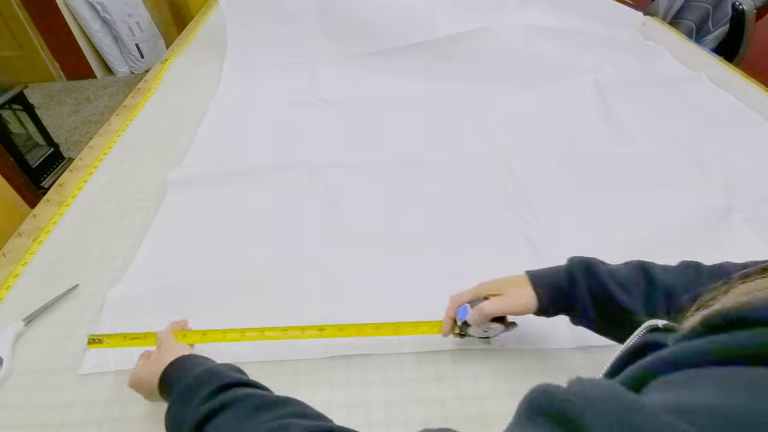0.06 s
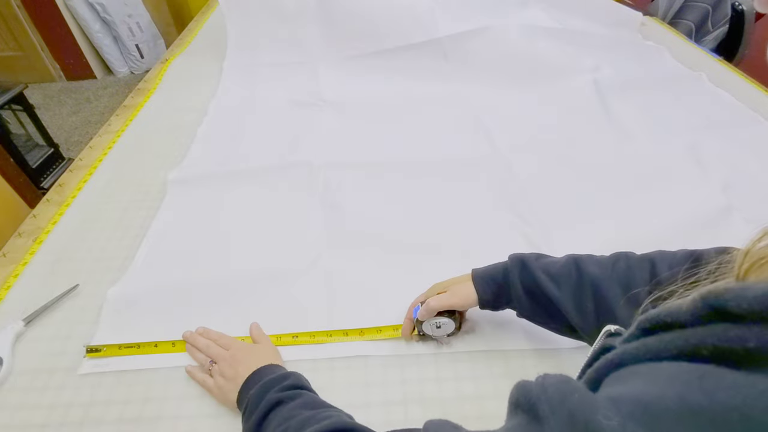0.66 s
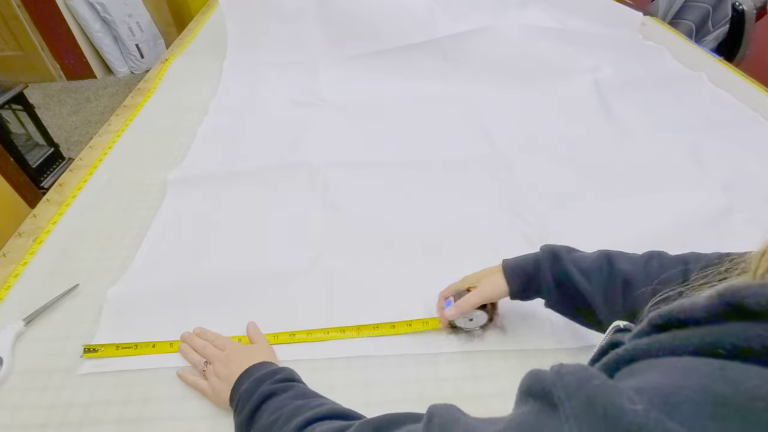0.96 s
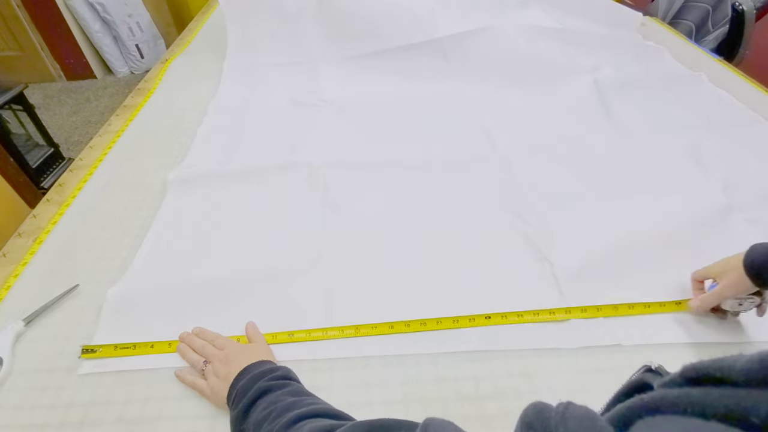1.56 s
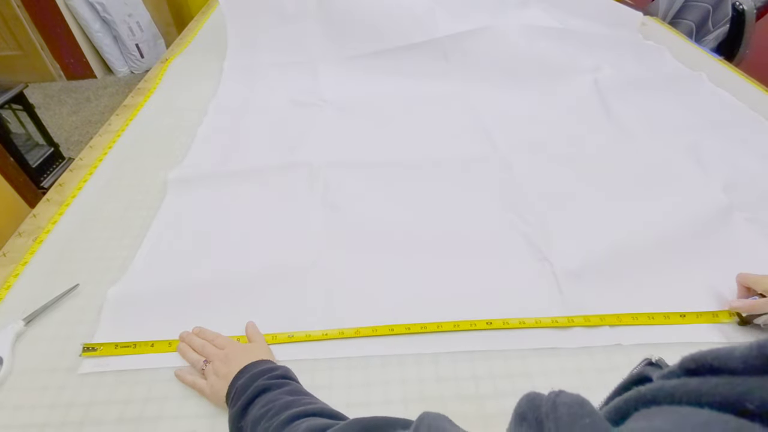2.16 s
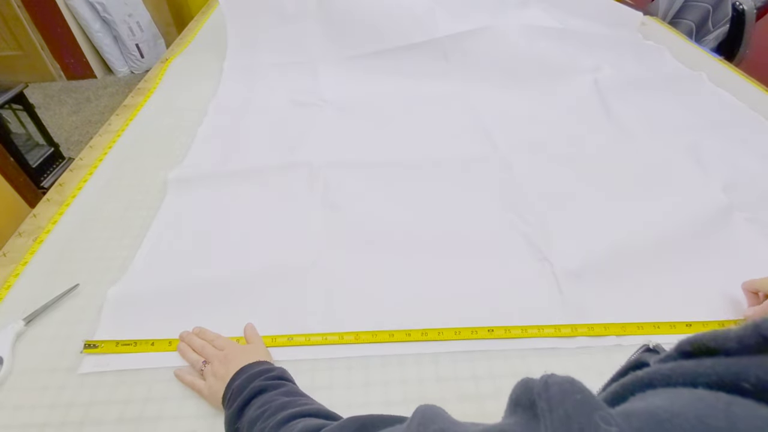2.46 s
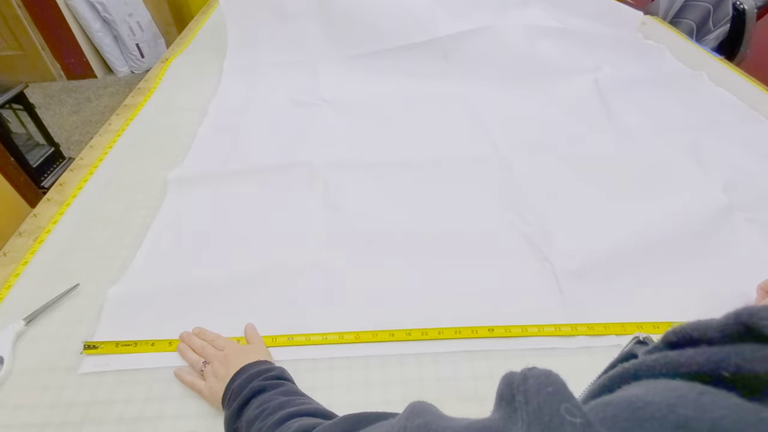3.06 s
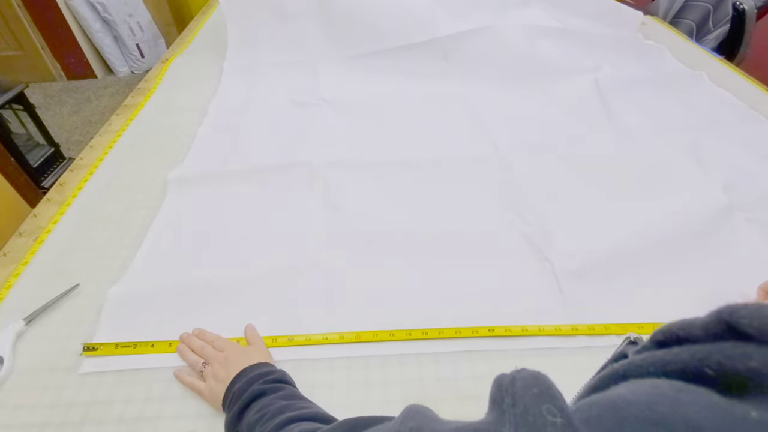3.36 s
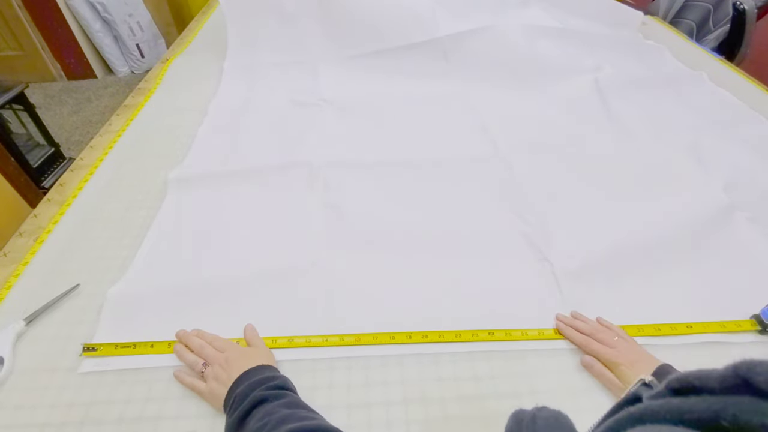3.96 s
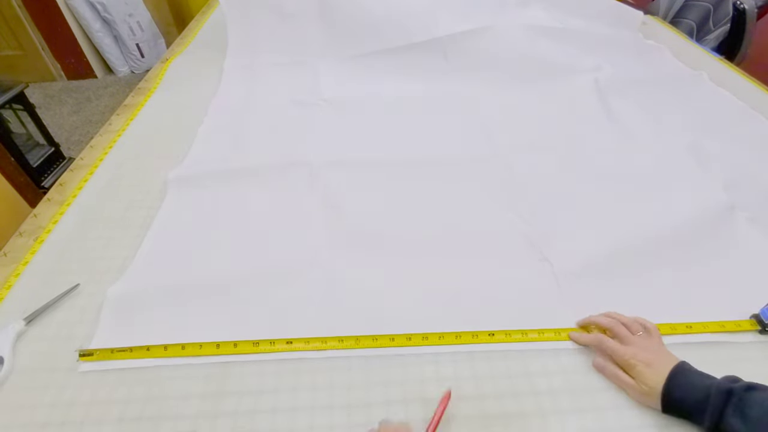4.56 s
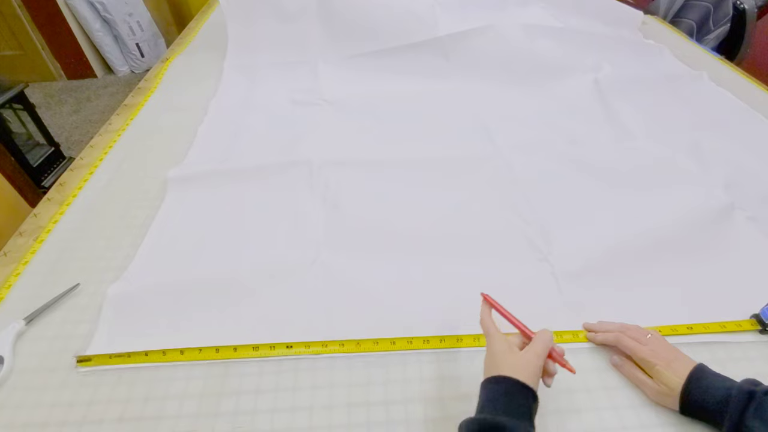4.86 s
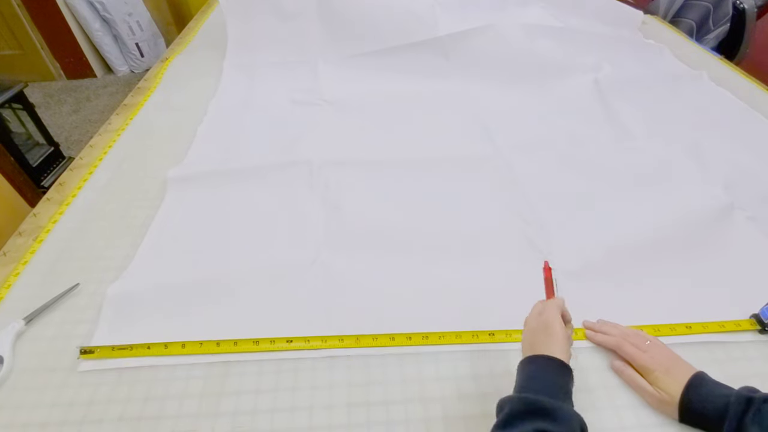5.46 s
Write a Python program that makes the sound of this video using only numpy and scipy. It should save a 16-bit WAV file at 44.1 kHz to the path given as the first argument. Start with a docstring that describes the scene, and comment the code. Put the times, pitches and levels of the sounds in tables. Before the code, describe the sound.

Indoors, a tape measure blade snaps onto a table and slides out with clicks, then low thumps and crisp fabric rustling.

```python
"""A steel tape measure on stiff fabric, on a craft table in a small room. The blade slaps down and rings,
then hisses out by sliding friction, in one long pull and a few tugs, as its coil scrapes in the case.
The case is set down with two dull bumps that excite the modes of the table top. A hand smooths the
fabric, which crackles as it buckles, and picks up a pen. Ventilation and mains hum fill the room."""
import sys
import numpy as np
from scipy import signal
from scipy.fft import rfft, irfft, next_fast_len
from scipy.io import wavfile
from scipy.ndimage import uniform_filter1d, map_coordinates

SR = 44100
rng = np.random.default_rng(int(sys.argv[2]) if len(sys.argv) > 2 else 0)


def dump_mix(stems):
    """Bounce the given channels to the path in sys.argv[1] as a 16-bit WAV at rate SR."""
    frames = np.atleast_2d(stems).T  # one column per channel
    limited = np.clip(frames, -1, 1)  # hard clip at full scale
    pcm = np.round(limited * 32767).astype(np.int16)
    wavfile.write(sys.argv[1], SR, pcm)


N = 246938

# Coherence of a diffuse field. Each row: frequency in Hz, left-right correlation.
DIFFUSE_COHERENCE = [(60, 0.32), (130, 0.78), (380, 0.78), (750, -0.083), (1300, -0.22), (5500, 0.059),
                     (8000, 0.86), (15000, 0.96)]
# Spectrum of buckling fabric. Each row: frequency in Hz, relative density in dB.
CREASE_SPECTRUM = [(300, -40), (900, -16.5), (1900, -30), (2800, -21), (4100, -11), (5700, -13),
                   (7800, -1.5), (10000, -6), (11500, 0), (13500, -3), (16000, -1)]


def amp(db):
    """Decibels as an amplitude ratio."""
    return 10 ** (np.asarray(db) / 20)


def unit(x):
    """Normalisation to rms 1."""
    return x / np.sqrt(np.mean(x ** 2) + 1e-20)


def decay(t, t60):
    """Exponential damping: 60 dB in t60 seconds."""
    return amp(-60 * t / t60)


def along(points, hz):
    """Interpolation of (Hz, value) points on a logarithmic frequency axis."""
    f, values = np.transpose(points)
    return np.interp(np.log(hz + 1), np.log(f + 1), values)


def wobble(rate):
    """Smooth random modulation, with rate knots a second."""
    knots = rng.standard_normal(int(N * rate / SR) + 4)
    return map_coordinates(knots, [np.arange(N) * rate / SR])


def filtered(x, response):
    """Linear filtering: the spectrum is multiplied by a frequency response."""
    n = x.shape[-1]
    m = next_fast_len(n + 8192)
    return irfft(rfft(x, m) * response(np.fft.rfftfreq(m, 1 / SR)), m)[..., :n]


def coloured(pair, spectrum, coherence=None):
    """Partial coherence: two independent signals mix into left and right with a given spectrum."""
    # Coherence of a nearby source. Each row: frequency in Hz, left-right correlation.
    near_coherence = [(250, 0.99), (800, 0.75), (2200, 0.51), (4500, 0.2), (6400, 0.15), (7800, 0.65),
                      (16000, 0.57)]

    def response(hz):
        angle = np.arccos(np.clip(along(coherence or near_coherence, hz), -1, 1)) / 2
        return amp(along(spectrum, hz)) * [np.cos(angle), np.sin(angle)]
    mid, side = filtered(pair, response)
    return np.array([mid + side, mid - side])


def panned(x, pan_db):
    """Level difference: left exceeds right by pan_db."""
    return x * amp(np.array([pan_db, -pan_db]) / 2).reshape(2, -1)


def shaded(x, pan_db):
    """Acoustic shadow: an obstacle screens the far microphone, most at short wavelengths."""
    treble = filtered(x, lambda hz: 1 / (1 + (9000 / (hz + 1)) ** 3))
    return x - treble + panned(treble, pan_db)


def placed(x, lead_s, below_hz=6800):
    """Time difference: under below_hz, the left channel leads by lead_s."""
    phase = lambda hz: np.pi * hz * lead_s * (hz < below_hz)
    return filtered(x, lambda hz: np.exp(1j * np.array([phase(hz), -phase(hz)])))


def add(track, s, x):
    """Superposition of x on the track from s seconds."""
    start = max(round(s * SR), 0)
    track[:, start:start + x.shape[-1]] += x[..., :N - start]


def grains(rate, spread_db, size=N):
    """Friction as a Poisson process: tiny slips of uneven size, on average rate a second."""
    slips = rng.random(size) < rate / SR
    strength = amp(spread_db * np.minimum(rng.exponential(size=size), 4))
    return slips * strength * rng.standard_normal((2, size))


def stroke(length):
    """Stick-slip friction under a push that swells quickly and fades after length seconds."""
    progress = np.arange(SR // 4) / SR / length
    slips = unit(grains(rate=2100, spread_db=0.0, size=len(progress)))
    return slips * (1 - np.exp(-progress / 0.034)) / (1 + progress ** 8)


def gesture(s, length, attack_s=0.012, release_s=0.028):
    """Envelope of one hand movement: exponential attack, hold, exponential release."""
    t = np.maximum(np.arange(N) / SR - s, 0)
    return (1 - np.exp(-t / attack_s)) * np.exp(-np.maximum(t - length, 0) / release_s)


def shifting(x, patchy_db, peak_db=0, glide=None):
    """Resonances come and go as a contact moves; a broad one may glide along (s, Hz) points."""
    hz, t, spectra = signal.stft(x, SR, nperseg=512)
    patches = uniform_filter1d(rng.standard_normal(spectra.shape[1:]), size=5, axis=0)
    patches = uniform_filter1d(patches, size=9, axis=1)
    gain = amp(patchy_db * unit(patches))
    if glide:
        octaves = np.log2((hz[:, None] + 1) / np.interp(t, *np.transpose(glide)))
        gain *= amp(peak_db * np.exp(-(octaves / 0.22) ** 2))
    gain /= np.sqrt(np.mean(gain ** 2, axis=0))
    return signal.istft(spectra * gain, SR, nperseg=512)[1][:, :N]


def ring(modes, t):
    """Free vibration: a sum of damped modes, struck at new strengths each time."""
    return sum(amp(db + rng.normal(0, 1)) * decay(t, t60) * np.sin(2 * np.pi * hz * t)
               for hz, db, t60 in modes)


def burst(spectrum, vary_db, rise_s, t60, tail_db, tail_t60):
    """A broadband transient with a slower tail, coloured anew each time; rms 1 over its loudest 2 ms."""
    t = np.arange(SR // 3) / SR
    envelope = (1 - np.exp(-t / rise_s)) * (decay(t, t60) + amp(tail_db) * decay(t, tail_t60))
    ripple_db = vary_db * rng.standard_normal(44)
    ripple = lambda hz: amp(np.interp(hz, np.linspace(0, SR / 2, len(ripple_db)), ripple_db))
    noise = filtered(rng.standard_normal((2, len(t))), ripple)
    crack = coloured(noise, spectrum) * envelope
    power = uniform_filter1d(np.mean(crack ** 2, axis=0), size=88)
    return crack / np.sqrt(power.max())


def ventilation():
    """Moving air makes a low, diffuse rush; fan and mains add wavering tones."""
    # Air noise. Each row: frequency in Hz, relative density in dB.
    air_spectrum = [(25, -17), (60, -8), (84, -4), (103, 3), (138, -10.5), (200, -8.5), (390, -9.5),
                    (620, -22), (880, -16), (1600, -35.5), (2500, -26), (3100, -36.5), (16000, -37.5)]
    # Fan and mains tones. Each row: frequency in Hz, nominal rms level in dB.
    tones = [(120, -68), (171, -73), (207, -72.5), (268, -77.5)]
    t = np.arange(N) / SR
    air = amp(-62) * unit(coloured(rng.standard_normal((2, N)), air_spectrum, DIFFUSE_COHERENCE))
    hum = np.zeros(N)
    for hz, db in tones:
        peak = np.sqrt(2) * amp(db + 1.5 * wobble(4.6))
        hum += peak * np.sin(2 * np.pi * hz * t + 0.35 * wobble(4.01))
    return panned(air + hum, pan_db=1.5)


def room(x):
    """Reverberation: reflections arrive from all sides, and the treble is absorbed first."""
    # Reverberation time. Each row: frequency in Hz, T60 in seconds.
    decay_times = [(150, 0.55), (1000, 0.31), (5000, 0.24), (10000, 0.11), (16000, 0.057)]
    # Colour of the reflections. Each row: frequency in Hz, gain in dB.
    wall_response = [(100, 2.5), (1000, -2), (4000, 0), (14000, 0.5)]
    hz, t, spectra = signal.stft(rng.standard_normal((2, SR // 2)), SR, nperseg=256)
    tail = signal.istft(spectra * decay(t, along(decay_times, hz)[:, None]), SR, nperseg=256)[1]
    tail = np.pad(tail / np.linalg.norm(tail[0]), ((0, 0), (SR // 200, 0)))  # 5 ms of travel
    return coloured(signal.fftconvolve(x, tail, axes=1)[:, :N], wall_response, DIFFUSE_COHERENCE)


def hand_pan(s):
    """The level difference that locates the hand at s seconds."""
    # The hand's path. Each row: time in seconds, left-over-right treble level in dB.
    path = [(0, 10), (0.2, 0), (0.7, -3), (2, 0), (3.8, -1), (4.05, -1.5), (4.8, -9), (5.6, -9.5)]
    return np.interp(s, *np.transpose(path))


def rustle(snaps_per_s=60, snap_decay_s=0.003):
    """Friction of skin and sleeves on the weave comes in clumps and sets off small snaps."""
    # Rubs. Each row: start in seconds, length in seconds, relative level in dB.
    rubs = [(0.0, 0.35, -55.5), (0.413, 0.34, -69), (0.587, 0.018, -56), (2.878, 0.24, -82.5),
            (3.216, 0.038, -74), (3.435, 0.035, -74.5), (3.554, 0.032, -67.5), (3.82, 0.51, -74.5),
            (3.845, 0.018, -62), (4.053, 0.03, -58.5), (4.376, 0.3, -68), (4.474, 0.12, -61.5),
            (4.675, 0.13, -60), (4.787, 0.059, -44.5), (5.0, 0.55, -77), (5.26, 0.04, -65),
            (5.396, 0.03, -65)]
    # Friction on cloth. Each row: frequency in Hz, relative density in dB.
    rub_spectrum = [(700, -20), (1800, -15), (2800, -15.5), (4100, -13.5), (5700, -11), (8200, -7.5),
                    (11500, -8), (15000, -6), (16000, -13)]
    push = sum(amp(db) * gesture(s, length) for s, length, db in rubs)
    clumps = grains(rate=7400, spread_db=2.0) * amp(4 * wobble(130))
    weave = shifting(coloured(clumps, rub_spectrum), patchy_db=3.5)
    snap = np.exp(-np.arange(SR // 20) / SR / snap_decay_s)
    flurry = signal.fftconvolve(rng.random(N) < snaps_per_s / SR, snap)[:N]
    crackle = coloured(flurry * rng.standard_normal((2, N)), CREASE_SPECTRUM)
    cloth = amp(3.5) * unit(weave) + amp(-4) * unit(crackle)
    return shaded(push * cloth, hand_pan(np.arange(N) / SR))


def creases():
    """Buckling: stiff fabric and the blade on it snap brightly under the fingers."""
    # Snaps. Each row: start in seconds, relative level in dB.
    snaps = [(0.0166, -38.5), (0.042, -42), (0.104, -32.5), (0.1614, -28.5), (0.1664, -32), (0.2097, -24.5),
             (1.876, -35), (2.048, -44), (2.691, -42), (4.0539, -30), (4.0766, -27.5), (4.34, -45),
             (4.3573, -36), (4.691, -37), (4.7399, -33.5), (4.7702, -29.5), (4.794, -17.5), (4.8388, -15),
             (4.883, -26), (4.9172, -32.5), (4.9406, -34), (5.002, -38), (5.0465, -39), (5.1295, -37.5),
             (5.164, -44), (5.1824, -41), (5.246, -39.5), (5.275, -37.5), (5.3675, -48), (5.401, -37.5),
             (5.478, -46), (5.5085, -46)]
    out = np.zeros((2, N))
    for s, db in snaps:
        snap = burst(CREASE_SPECTRUM, vary_db=4.5, rise_s=0.0012, t60=0.02, tail_db=-32.5, tail_t60=0.11)
        add(out, s, amp(db - 6) * shaded(snap, hand_pan(s)))
    return out


def scuffs():
    """Friction of fingers and pen on the table drives a broad, dull resonance."""
    # Scuffs. Each row: start in seconds, length in seconds, level in dB, centre frequency in Hz.
    contacts = [(3.547, 0.091, -58, 484), (4.011, 0.11, -63.5, 1040), (4.358, 0.015, -53.5, 604),
                (4.367, 0.045, -54, 980), (4.428, 0.13, -63, 940), (4.491, 0.048, -55.5, 1063),
                (4.519, 0.031, -52, 1650), (4.567, 0.0224, -58.5, 1330), (4.8, 0.12, -66, 730)]
    out = np.zeros((2, N))
    for s, length, db, hz in contacts:
        resonance = [(hz / 5, -22), (hz / 2.57, -6), (hz, 0),
                     (hz * 1.54, -6), (hz * 2.9, -18), (hz * 9, -38)]
        scuff = coloured(stroke(length), resonance)
        rms = np.sqrt(np.sum(scuff[0] ** 2) / (length * SR))
        add(out, s, amp(db) * scuff / rms)
    return out


def bumps(right_lag_s=0.0035, landing_s=3.557):
    """Impacts of blade and case excite the table's low modes; the case lands with a knock."""
    # Impacts on the table. Each row: start in seconds, relative level in dB.
    impacts = [(0.243, -58), (2.073, -61.5), (3.229, -39), (3.558, -44.5), (3.603, -42.5)]
    # Modes of the table, and of the case on it. Each row: frequency in Hz, gain in dB, T60 in seconds.
    table_modes = [(45.1, -14, 0.6), (61.65, 2, 0.46), (81, -1.5, 0.9), (101, -8.5, 0.35),
                   (170.2, -8.5, 0.27), (273, -15, 0.2)]
    knock_modes = [(233, -11.5, 0.47), (272, -7.5, 0.29), (591, -4, 0.21), (695, -15, 0.25),
                   (1277, -18, 0.14)]
    out, t = np.zeros((2, N)), np.arange(SR) / SR
    late = np.maximum(t - right_lag_s, 0)
    for s, db in impacts:
        boom = np.array([ring(table_modes, t), ring(table_modes, late)])
        add(out, s, amp(db) * boom * (1 - np.exp(-t / 0.0052)))
    out = panned(out, pan_db=7.0)
    knock = ring(knock_modes, t) * (1 - np.exp(-t / 0.0064))
    add(out, landing_s, amp(-40) * knock)
    return out


def drags():
    """Forced vibration: the hollow case groans as it judders over the table."""
    # Slides of the case. Each row: start in seconds, length in seconds, relative level in dB.
    slides = [(0.529, 0.1, -56), (1.074, 0.034, -54.5), (1.159, 0.057, -43), (1.51, 0.083, -58.5),
              (2.544, 0.068, -67), (3.555, 0.043, -56.5)]
    # Resonances of the case. Each row: frequency in Hz, bandwidth in Hz, gain in dB.
    shell_modes = [(639, 31, -3.5), (775.5, 51, 0.5), (964, 75, -18.5)]

    def shell(f):
        return sum(amp(db) * 1j * f * width / (hz ** 2 - f ** 2 + 1j * f * width)
                   for hz, width, db in shell_modes)
    out = np.zeros((2, N))
    for s, length, db in slides:
        add(out, s, amp(db + 22) * filtered(stroke(length), shell))
    return out


def ticks():
    """Brief contacts have wide spectra: the blade catches on the mouth of its case."""
    # Catches. Each row: start in seconds, relative level in dB.
    catches = [(0.4327, -32.5), (0.4474, -28), (0.6013, -32), (0.6744, -42.5), (0.7108, -48),
               (1.0645, -27.5), (1.0872, -28.5), (1.3131, -34.5), (1.3254, -18.5), (1.3358, -26),
               (1.446, -24), (1.491, -26), (1.7003, -25), (2.0204, -36), (2.2866, -33)]
    # One tick. Each row: frequency in Hz, relative density in dB.
    spectrum = [(200, -14), (700, 9.5), (1500, -5.5), (2200, 4.5), (3600, 7.5), (5500, 3), (8000, 6.5),
                (15500, 7)]
    out = np.zeros((2, N))
    for s, db in catches:
        tick = burst(spectrum, vary_db=5.0, rise_s=0.0006, t60=0.017, tail_db=-42.0, tail_t60=0.042)
        add(out, s, amp(db - 12) * tick)
    return out


def pull(start_hz=7757, end_hz=14400, taut_s=1.01):
    """Sliding friction: the blade hisses through the slot as the coil scrapes in the plastic case."""
    # The long pull. Each row: time in seconds, hiss level in dB, which follows the speed.
    long_pull = [(0.87, -66.5), (0.96, -51), (1.05, -56.5), (1.09, -48.5), (1.3, -48), (1.48, -45.5),
                 (1.66, -58), (1.76, -52.5), (1.87, -69.5)]
    # Tugs. Each row: start and length in seconds, relative hiss and rattle in dB, resonance in Hz.
    tugs = [(1.864, 0.078, -58, -70.5, 8500), (1.989, 0.079, -70, -71.5, 9000),
            (2.267, 0.035, -59.5, -77, 7800), (2.425, 0.08, -61, -78, 3930), (2.509, 0.071, -59, -68, 3700),
            (2.67, 0.016, -69, -77, 8000)]
    # Friction of blade and of coil. Each row: frequency in Hz, relative density in dB.
    blade_spectrum = [(2000, -13.5), (3500, -4), (5500, -2), (8000, 0.5), (11800, 2.5), (13200, 1),
                      (15200, 4.5), (16000, -3)]
    coil_spectrum = [(120, -4), (380, 3.5), (680, -1.5), (1400, -5.5), (2000, -3), (2700, -0.5),
                     (3700, -2.5), (4900, -7.5), (9000, -45.5)]
    t = np.arange(N) / SR
    times, levels_db = np.transpose(long_pull)
    hiss = amp(np.interp(t, times, levels_db, left=-np.inf, right=-np.inf))
    taut = 0.5 + 0.5 * np.tanh((t - taut_s) / 0.03)  # the coil scrapes once its slack is taken up
    rattle = amp(-10.5) * taut * hiss
    glide = [(times[0], start_hz), (times[-1], end_hz)]  # a resonance climbs through the long pull
    for s, length, hiss_db, rattle_db, hz in tugs:
        tug = gesture(s, length)
        hiss += amp(hiss_db) * tug
        rattle += amp(rattle_db) * tug
        glide.append((s + length / 2, hz))
    blade = coloured(grains(rate=14000, spread_db=3.5), blade_spectrum)
    blade = unit(shifting(blade, patchy_db=2.0, peak_db=5.0, glide=sorted(glide)))
    coil = coloured(grains(rate=3000, spread_db=0.5), coil_spectrum)
    coil = unit(shifting(coil, patchy_db=4.0))
    flutter = amp(4.0 + 2.8 * wobble(29.55))
    return shaded(hiss * blade, pan_db=5.0) + panned(rattle * flutter * coil, pan_db=-1.0)


def slap():
    """Impact and rebound: each landing of the steel blade cracks and excites its modes."""
    # Landings. Each row: start in seconds, relative level in dB.
    landings = [(0.2411, -8), (0.2603, -19.5), (0.3124, -24.5), (0.34, -35)]
    # Modes of the blade. Each row: frequency in Hz, gain in dB, T60 in seconds.
    blade_modes = [(1490, -10, 0.2), (2560, -16, 0.23), (11940, -1.5, 0.16), (14400, 0, 0.18)]
    # The crack. Each row: frequency in Hz, relative density in dB.
    spectrum = [(60, -20), (200, -10.5), (370, -8.5), (490, -15.5), (620, -0.5), (800, -1), (1000, -5.5),
                (1250, -1), (2000, -10.5), (4200, -8.5), (5800, -7), (7600, -1.5), (12200, -4),
                (13100, -12.5), (14300, 6), (15800, -8)]
    out, t = np.zeros((2, N)), np.arange(SR // 3) / SR
    for s, db in landings:
        crack = burst(spectrum, vary_db=3.0, rise_s=0.00078, t60=0.056, tail_db=-2.5, tail_t60=0.19)
        add(out, s, amp(db - 8.5) * crack + amp(db - 26.5) * ring(blade_modes, t))
    return panned(shaded(out, pan_db=-6.5), pan_db=3.0)


def scene():
    """Superposition of direct sound, reverberation and ventilation."""
    hand_lead_s = -0.0002
    blade = placed(slap(), lead_s=0.00025)
    snaps = placed(creases() + ticks(), hand_lead_s)
    rubbing = placed(pull() + rustle() + scuffs() + drags(), hand_lead_s)
    reflections = room(amp(-8.5) * blade + amp(-3.5) * snaps + amp(-9.5) * rubbing)
    return blade + snaps + rubbing + reflections + bumps() + ventilation()


def record(dry):
    """Band limiting removes the deepest bass and the highest treble."""
    low_hz, top_hz = 36, 16100
    highpassed = signal.sosfilt(signal.butter(2, low_hz, "high", fs=SR, output="sos"), dry)
    return filtered(highpassed, lambda hz: 1 / (1 + (hz / top_hz) ** 160))


dry = scene()
out = record(dry)
dump_mix(out)
```